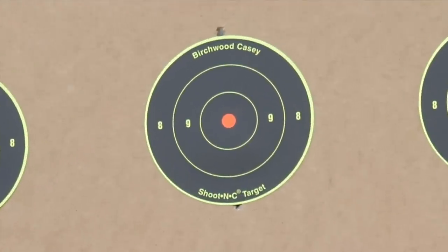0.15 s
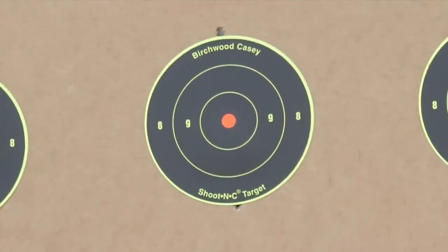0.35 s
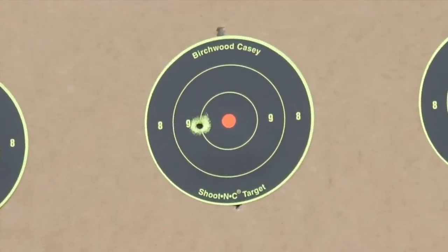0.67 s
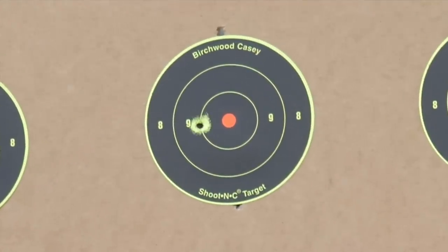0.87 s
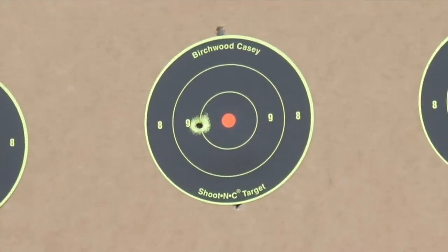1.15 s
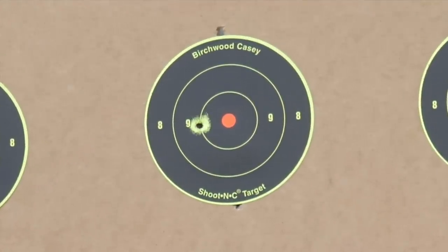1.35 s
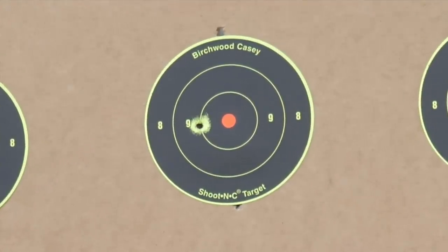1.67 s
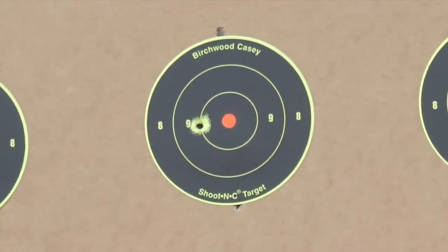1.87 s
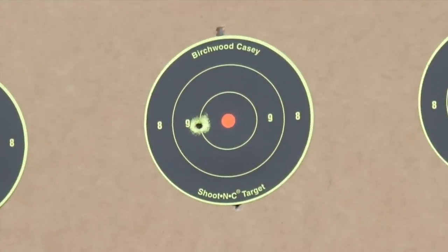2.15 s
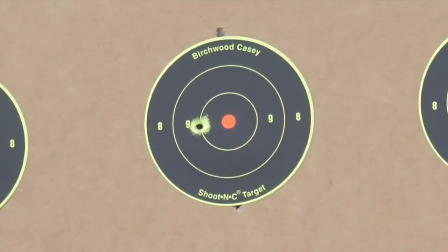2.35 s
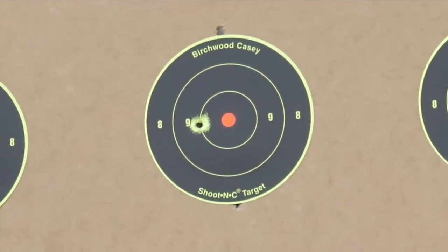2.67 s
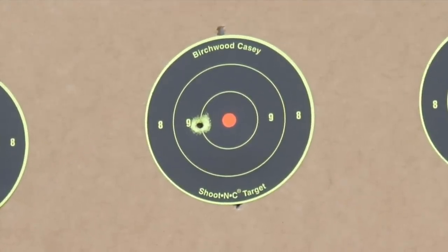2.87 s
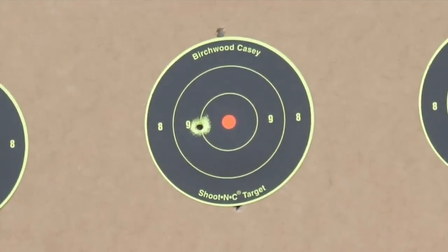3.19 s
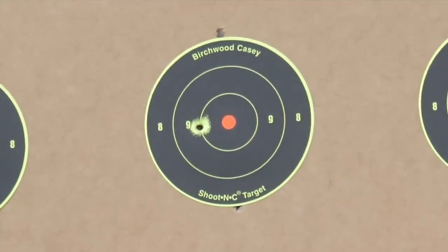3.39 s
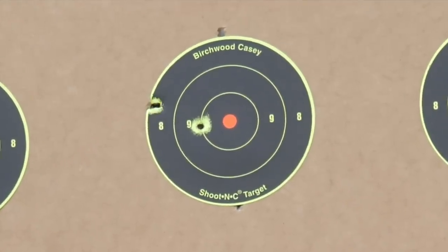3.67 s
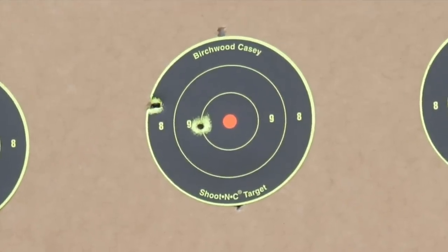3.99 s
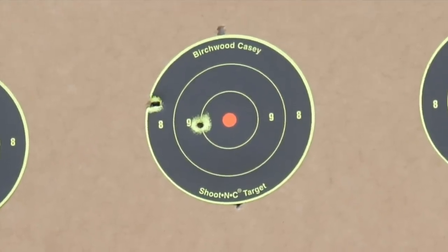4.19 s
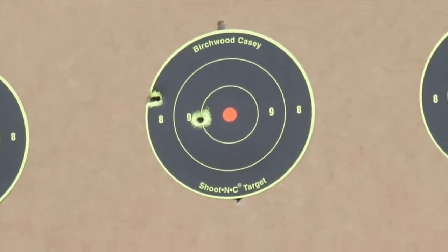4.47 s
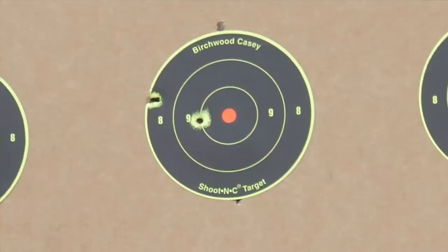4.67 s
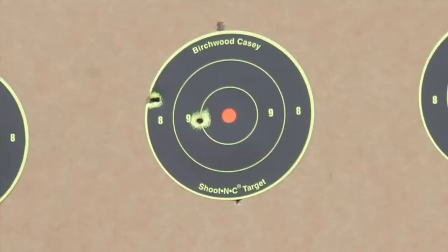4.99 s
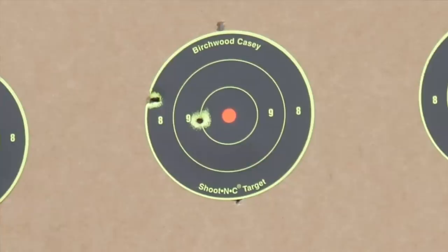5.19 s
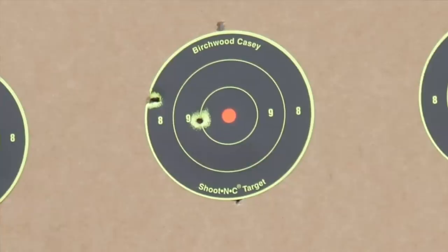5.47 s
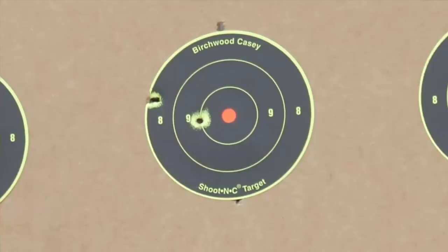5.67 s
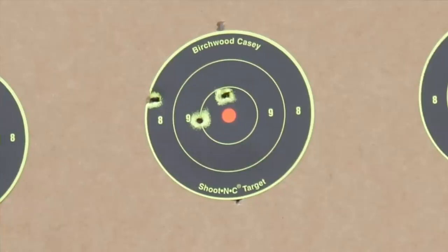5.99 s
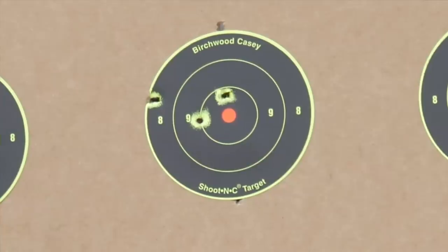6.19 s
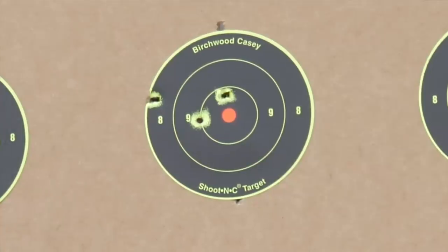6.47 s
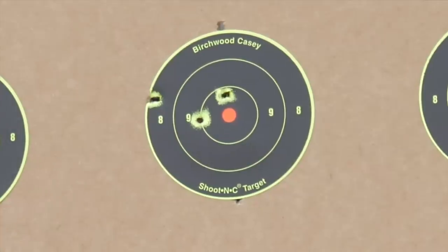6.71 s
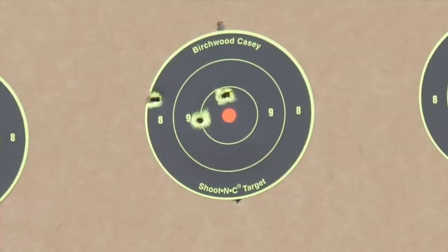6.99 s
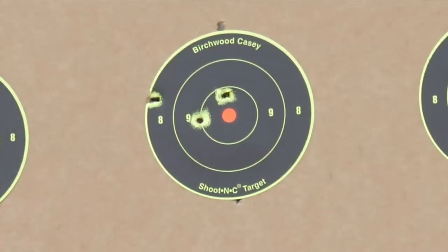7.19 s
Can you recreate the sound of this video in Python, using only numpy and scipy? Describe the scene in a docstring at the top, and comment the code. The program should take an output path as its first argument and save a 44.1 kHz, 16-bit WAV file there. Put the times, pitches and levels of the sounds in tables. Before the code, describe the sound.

Sharp air rifle cracks, each preceded by a tiny mechanical tick and whir, echo outdoors over rumbling wind, which vanishes before the third shot.

```python
"""Air rifle at an outdoor range

Three shots overload the input. In each, the action ticks, scrapes, whirs and chirps (noise and a falling sine),
the muzzle blasts (shaped noise with nearby reflections), the rifle rings (decaying sines) and the range echoes.
Noise bursts are pellet strikes and knocks. A splice with a soft click cuts off the buffeting and hooting wind
before the third shot; a distant wash and still air (shaped noise), a high sizzle and two faint tones lie behind."""
import sys
import numpy as np
from scipy import signal
from scipy.fft import rfft, irfft, next_fast_len
from scipy.io import wavfile
from scipy.ndimage import map_coordinates

SR = 44100
rng = np.random.default_rng(int(sys.argv[2]) if len(sys.argv) > 2 else 0)


def master_out(mix):
    """Clip the mix to full scale and print it as 16-bit PCM to the path in sys.argv[1]."""
    frames = np.transpose(np.atleast_2d(mix))
    ceiling = np.clip(frames, -1, 1)
    pcm = np.round(ceiling * 32767).astype(np.int16)
    wavfile.write(sys.argv[1], SR, pcm)


N = 323694

# Spectra of noise, scaled to rms 1 in use. Each row: frequency in Hz, relative density in dB per Hz.
STILL_SPECTRUM = [(12, -30.5), (20, -7), (64, -4.5), (101, -3.5), (137, -10), (175, -10), (333, -20),
                  (439, -16), (811, -25.5), (906, -21.5), (1100, -30.5), (2330, -30), (7310, -37.5),
                  (15500, -46)]
WASH_SPECTRUM = [(100, -18.5), (300, 3.5), (420, -4.5), (560, -1.5), (900, 2), (1450, 0.5), (2000, -11),
                 (3500, -27.5), (8000, -59)]
BUFFET_SPECTRUM = [(10, -3), (25, 2.5), (40, -9), (60, -14), (100, -23.5), (170, -31), (300, -42.5),
                   (700, -64), (2000, -100)]
ECHO_SPECTRUM = [(60, -9), (160, 0.5), (400, -11.5), (700, -15.5), (1400, -3.5), (3000, -2), (6000, 5),
                 (8000, 2), (11000, -4.5), (15500, -17.5)]
SCRAPE_SPECTRUM = [(200, -12), (900, -6.5), (1600, 1), (2700, -0.5), (3800, -7.5), (6500, 2), (8200, -3),
                   (9500, -14), (15500, -22)]
WHIR_SPECTRUM = [(100, -6), (300, 0.5), (700, 2.5), (1000, -5), (2500, -4.5), (3300, -7.5), (6200, 1.5),
                 (8500, -1), (11000, -1), (15500, -14.5)]
MUZZLE_SPECTRUM = [(30, -17), (90, -10.5), (200, -3.5), (350, -9), (550, -2), (1000, -6.5), (1500, -2),
                   (3000, -2), (5000, -0.5), (7500, 0), (10000, -0.5), (12500, -9.5), (15500, -18.5)]
# Faint far-off tones. Each row: start in seconds, pitch in Hz, level in dB, hold in seconds.
FAR_TONES = [(2.135, 745, -50.5, 0.075), (2.34, 1210, -47, 0.024)]
# Gusts on top of the breeze. Each row: centre in seconds, extra buffeting in dB, extra hoot in dB.
GUSTS = [(.6, 5, 0), (1.33, 9, 11.5), (1.98, 6.5, -1), (2.45, 13, 1.5), (3.1, 10.5, 6), (3.62, 7, 0),
         (3.88, 6.5, 0), (4.3, 6, 10.5), (4.6, 9, 6.5)]
# Pellet strikes, scattering bits and small knocks. Each row: start in seconds, mean level in dB,
# centre in Hz, width in octaves, hold in seconds, T60 in seconds.
KNOCKS = [(0.748, -27.5, 1100, 0.85, 0.014, 0.061), (0.889, -54.5, 11000, .3, 0.007, 0.071),
          (0.93, -55.5, 9000, 0.64, .03, .12), (0.941, -42, 2300, 0.41, 0.015, 0.11),
          (1.066, -50, 3100, 0.92, 0.022, .12), (1.069, -54, 11500, 0.31, 0.011, .1),
          (1.17, -62.5, 5000, 1.1, .015, 0.12), (1.776, -46, 1000, 0.54, 0.03, 0.31),
          (2.41, -47, 1230, .35, 0.014, 0.17), (3.68, -24.5, 1520, 0.8, 0.02, 0.043)]
# Backstop booms after a strike. Each row: start in seconds, level in dB.
BOOMS = [(0.753, -28), (3.688, -33)]
# Swells from the banks and the far end. Each row: delay in seconds, spread in seconds, gain in dB.
ECHO_SWELLS = [(.15, .024, 2.5), (.22, 0.022, 3.5), (.275, 0.046, 2.5), (.42, .04, 2.5)]
# Decay of the range echo. Each row: frequency in Hz, T60 in seconds.
ECHO_T60 = [(150, 0.89), (1500, 0.83), (4000, .66), (7000, .52), (10000, .4), (15000, 0.32)]
# Modes of the rifle. Each row: frequency in Hz, mean level in dB before the shot's ring gain, T60 in seconds.
RIFLE_MODES = [(160.2, -26.5, 0.46), (200, -26.5, .25), (284, -30, 0.48), (555, -23, .13), (745, -13, 0.2),
               (915, -21, 0.18), (1270, -20, .11), (1467, -21.5, .28), (2100, -22, .25), (3150, -23.5, .5),
               (4330, -20.5, .12), (5690, -24.5, .28), (6998, -17.5, .16), (9800, -17.5, .11)]
# Shots. Each row: muzzle crack in seconds, mean blast gain in dB, low thump in dB, ring gain in dB.
SHOTS = [(0.6484, -2, -21.5, -1), (3.5649, -0.5, -27.5, -1.5), (5.8086, -0.5, -22.5, -0.5)]

SPLICE_S = 4.6623
FRESHEN_AT_S, FRESHEN_S = 2.2, 1.1  # midpoint of the rise, time either side
LIGHT_BUFFET_DB, FRESH_BUFFET_DB = -46.5, -31
GUST_S = 0.16  # half the length of a gust
HOOT_HZ, HOOT_RISE_HZ = 180, 45.3  # in a light breeze, rise when fresh
HOOT_DB, HOOT_RISE_DB = -61, 6.5
WASH_DB, WASH_RISE_DB, LATE_WASH_DB = -58.5, 4.5, -61.5  # light, rise when fresh, after the splice
SIZZLE_DB, SIZZLE_SINK_DB_PER_S = -69, 1.45
WHIR_LEAD_S, WHIR_SWELL_S = 0.064, 0.015  # peak ahead of the crack, duration of the swell
WHIR_PEAK_DB, WHIR_RUN_DB = -31.5, -37.5
# Air blast levels, before the shot's blast gain
RISE_DB, RISE_S = -20, 0.0034
CRACK_DB, CRACK_T60_S = 1, 0.011
DISCHARGE_DB, DISCHARGE_T60_S = 1, 0.13
DISCHARGE_DELAY_S, DISCHARGE_ATTACK_S, DISCHARGE_HOLD_S = 0.003, 0.00041, 0.009
TOP_HZ = 15800

TIME_S = np.arange(N) / SR
LEAD = SR // 4  # samples ahead of an event's age zero
AGE_S = (np.arange(SR + LEAD) - LEAD) / SR


def amp(db):
    """Decibels to gain."""
    return 10 ** (np.asarray(db) / 20)


def along(points, hz):
    """Interpolate (Hz, value) points on a log frequency axis."""
    points_hz, values = np.transpose(points)
    return np.interp(np.log(hz + 1), np.log(points_hz), values)


def wobble(rate_hz, size):
    """Smooth random curve with rate_hz knots a second."""
    knots = rng.standard_normal(int(size * rate_hz / SR) + 4)
    return map_coordinates(knots, [np.arange(size) * rate_hz / SR])


def noise(shape_db, size):
    """Noise of rms 1, coloured by a function of frequency."""
    padded = next_fast_len(size)
    spectrum = rfft(rng.standard_normal(padded))
    shaped = irfft(spectrum * amp(shape_db(np.fft.rfftfreq(padded, 1 / SR))), padded)[:size]
    return shaped / np.std(shaped)


def coloured(spectrum, size=len(AGE_S)):
    """Noise with a tabled spectrum."""
    return noise(lambda hz: along(spectrum, hz), size)


def band(centre_hz, octaves, size=len(AGE_S)):
    """Noise in one bell-shaped band; power falls to 1/e at the given octaves off centre."""
    def bell_db(hz):
        return -10 * np.log10(np.e) * (np.log2((hz + 1) / centre_hz) / octaves) ** 2
    return noise(bell_db, size)


def fade(t60_s, attack_s, hold_s=0, delay_s=0):
    """Envelope: wait, rise exponentially, hold, then die away."""
    age_s = np.maximum(AGE_S - delay_s, 0)
    rise = 1 - np.exp(-age_s / attack_s)
    return rise * amp(-60 * np.maximum(age_s - hold_s, 0) / t60_s)


def add(track, start_s, sound):
    """Mix an event into the track, its age zero at start_s."""
    index = round(start_s * SR) - LEAD + np.arange(len(sound))
    inside = (index >= 0) & (index < N)
    track[index[inside]] += sound[inside]


def breeze():
    """Strength of the breeze, rising smoothly from 0 (light) towards 1 (fresh)."""
    return (1 + np.tanh((TIME_S - FRESHEN_AT_S) / FRESHEN_S)) / 2


def outdoors(still_db=-53, opposed_db=-80, hiss_db=-81):
    """Still air and a distant wash, effectively mono, over separate faint hiss in each channel."""
    still = amp(still_db + 0.81 * wobble(3, N)) * coloured(STILL_SPECTRUM, N)
    wash_db = np.where(TIME_S < SPLICE_S, WASH_DB + WASH_RISE_DB * breeze(), LATE_WASH_DB)
    wash = amp(wash_db + 0.61 * wobble(8, N)) * coloured(WASH_SPECTRUM, N)
    opposed = amp(opposed_db) * coloured(STILL_SPECTRUM, N)  # very faint, of opposite sign in the channels
    hiss = amp(hiss_db) * rng.standard_normal((2, N))
    return still + wash + np.array([opposed, -opposed]) + hiss


def sizzle(centre_hz=4600, octaves=0.27):
    """Narrow, high band of noise that slowly sinks away."""
    return amp(SIZZLE_DB - SIZZLE_SINK_DB_PER_S * TIME_S) * band(centre_hz, octaves, N)


def far_tones():
    """Two brief, faint sines in the distance."""
    track = np.zeros(N)
    for start_s, hz, db, hold_s in FAR_TONES:
        envelope = amp(db) * fade(t60_s=0.13, attack_s=0.0087, hold_s=hold_s)
        add(track, start_s, envelope * np.sin(2 * np.pi * hz * AGE_S))
    return track


def gusts():
    """Gains in dB that bell-shaped gusts add to the buffeting and to the hoot."""
    centre_s, buffet_db, hoot_db = np.transpose(GUSTS)
    swells = np.exp(-((TIME_S[:, None] - centre_s) / GUST_S) ** 2)
    return swells @ buffet_db, swells @ hoot_db


def wind(hoot_width_hz=28, steady=0.62, wander_hz=6, click_db=-25, click_rise_s=0.002):
    """Low noise buffets the microphone and a wandering narrow band hoots; a clicking splice cuts both off."""
    fresh = breeze()
    gust_buffet_db, gust_hoot_db = gusts()
    buffet_db = LIGHT_BUFFET_DB + (FRESH_BUFFET_DB - LIGHT_BUFFET_DB) * fresh + gust_buffet_db
    buffet = amp(buffet_db) * coloured(BUFFET_SPECTRUM, N)

    pitch_hz = HOOT_HZ + HOOT_RISE_HZ * fresh + wander_hz * wobble(4, N)
    phase = 2 * np.pi * np.cumsum(pitch_hz) / SR
    # random quadrature parts widen the tone into a band
    in_phase = steady + wobble(hoot_width_hz, N) / 2
    swing = in_phase * np.cos(phase) + wobble(hoot_width_hz, N) * np.sin(phase)
    hoot = amp(HOOT_DB + HOOT_RISE_DB * fresh + gust_hoot_db) * swing

    remaining_s = np.maximum(SPLICE_S - TIME_S, 0)
    # rises within milliseconds, then drops in one step at the cut
    splice_click = np.exp(-remaining_s / click_rise_s)
    return (remaining_s > 0) * ((buffet + hoot) * (1 - splice_click) + amp(click_db) * splice_click)


def downrange():
    """Strikes and knocks are short, grainy noise bursts; the backstop booms under the hardest."""
    track = np.zeros(N)
    for start_s, db, hz, octaves, hold_s, t60_s in KNOCKS:
        grain = amp(db + 1.5 * wobble(300.5, len(AGE_S)))
        add(track, start_s, grain * fade(t60_s, hold_s / 3, hold_s) * band(hz, octaves))
    for start_s, db in BOOMS:
        envelope = amp(db) * fade(t60_s=0.12, attack_s=0.0029, hold_s=0.015)
        add(track, start_s, envelope * band(203, 0.76))
    return track


def echo(level_db=-19, build_s=0.032):
    """Sound scattered by the range: decay depends on frequency, and far surfaces send back swells."""
    hz, frame_s, frames = signal.stft(coloured(ECHO_SPECTRUM), SR, nperseg=256)
    frame_age_s = np.maximum(frame_s - LEAD / SR, 0)
    decay = np.exp(-np.log(1000) * frame_age_s / along(ECHO_T60, hz)[:, None])
    tail = signal.istft(frames * decay, SR, nperseg=256)[1][:len(AGE_S)]
    swell_db = sum(db * np.exp(-((AGE_S - delay_s) / spread_s) ** 2)
                   for delay_s, spread_s, db in ECHO_SWELLS)
    build = 1 - np.exp(-np.maximum(AGE_S, 0) / build_s)
    return tail * build * amp(level_db + swell_db + 1.6 * wobble(110, len(AGE_S)))


def nearby(share_db=-4):
    """Impulse response: direct sound plus dense, decaying reflections from bench and shelter."""
    delay_s = np.arange(SR // 12) / SR
    reflections = rng.standard_normal(len(delay_s)) * (delay_s > 0.004) * amp(-60 * delay_s / 0.16)
    return (delay_s == 0) + amp(share_db) * reflections / np.linalg.norm(reflections)


def reflected_noise(spectrum, walls):
    """Noise of rms 1, coloured by the nearby surfaces."""
    reflected = signal.fftconvolve(coloured(spectrum), walls)[:len(AGE_S)]
    return reflected / np.std(reflected)


def ring(blur_rad=0.33):
    """Rifle modes as decaying sines, at slightly new strengths and random phases each time."""
    total = np.zeros(len(AGE_S))
    for hz, db, t60_s in RIFLE_MODES:
        phase = 2 * np.pi * (hz * AGE_S + rng.random()) + blur_rad * wobble(50, len(AGE_S))
        total += amp(db + rng.normal(0, 1)) * fade(t60_s, attack_s=0.005) * np.sin(phase)
    return total


def chirp(lead_s=0.0655, mid_hz=490, fall_hz_per_s=19000, spread_s=0.0053, level_db=-29.5):
    """Short sine that slides down as the action travels."""
    offset_s = AGE_S + lead_s
    pitch_hz = np.clip(mid_hz - fall_hz_per_s * offset_s, 250, 760)
    envelope = amp(level_db) / np.cosh(np.clip(offset_s / spread_s, -20, 20))
    return envelope * np.sin(2 * np.pi * np.cumsum(pitch_hz) / SR)


def action(walls, tick_lead_s=0.1212, tick_db=-35.0, tick_t60_s=0.0097, scrape_db=-42, scrape_t60_s=0.6):
    """The trigger ticks, then the moving parts scrape, and whir until the crack."""
    since_s = AGE_S + tick_lead_s

    def dying(t60_s):
        return (since_s > 0) * np.exp(-np.log(1000) * np.abs(since_s) / t60_s)

    tick = amp(tick_db) * dying(tick_t60_s) * band(4500, 0.83)
    scrape = amp(scrape_db) * dying(scrape_t60_s) * reflected_noise(SCRAPE_SPECTRUM, walls)
    swell = amp(WHIR_PEAK_DB) / np.cosh((AGE_S + WHIR_LEAD_S) / WHIR_SWELL_S)
    run = amp(WHIR_RUN_DB) * (AGE_S > -WHIR_LEAD_S)
    whir_level = np.maximum(swell, run) * (since_s > 0) * (AGE_S < 0)
    whir = whir_level * reflected_noise(WHIR_SPECTRUM, walls) * amp(1.1 * wobble(250, len(AGE_S)))
    return tick + scrape + whir


def air_blast():
    """Envelope of the muzzle noise: a brief rise into the crack, the crack, then the main discharge."""
    rise = amp(RISE_DB) * np.exp(-np.abs(AGE_S) / RISE_S) * (AGE_S < 0)
    crack = amp(CRACK_DB) * fade(CRACK_T60_S, attack_s=0.00015)
    discharge = amp(DISCHARGE_DB) * fade(
        DISCHARGE_T60_S, DISCHARGE_ATTACK_S, DISCHARGE_HOLD_S, DISCHARGE_DELAY_S)
    return rise + crack + discharge


def rifle():
    """Each shot sums action, air blast, low thump, ringing and echo; all share the same reflections."""
    track = np.zeros(N)
    walls = nearby()
    for crack_s, blast_db, thump_db, ring_db in SHOTS:
        blast_gain = amp(blast_db + 0.9 * wobble(400, len(AGE_S)))
        blast = blast_gain * air_blast() * reflected_noise(MUZZLE_SPECTRUM, walls)
        thump = amp(thump_db) * fade(t60_s=0.12, attack_s=0.0014) * band(140, 0.37)
        ringing = amp(ring_db) * ring()
        add(track, crack_s, action(walls) + chirp() + blast + thump + ringing + echo())
    return track


def scene():
    """Sum of all layers; every source but the outdoor background is identical in both channels."""
    return outdoors() + sizzle() + far_tones() + wind() + downrange() + rifle()


def record(dry, ceiling=0.92, hardness=8):
    """The input saturates towards its ceiling, then a low-pass sets the band limit."""
    clipped = dry / (1 + np.abs(dry / ceiling) ** hardness) ** (1 / hardness)
    low_pass = signal.firwin(401, TOP_HZ, fs=SR, window="blackman")
    return signal.fftconvolve(clipped, low_pass[None], mode="same", axes=1)


dry = scene()
out = record(dry)
master_out(out)
```